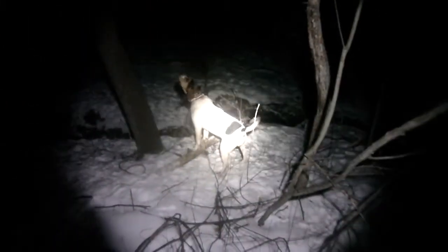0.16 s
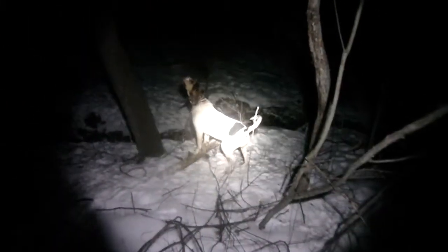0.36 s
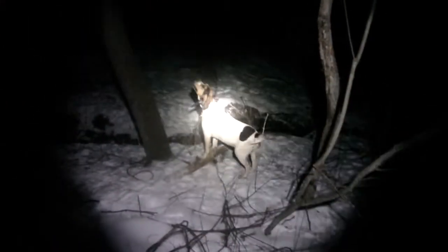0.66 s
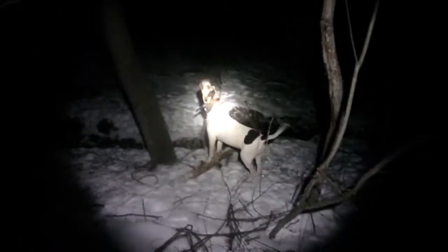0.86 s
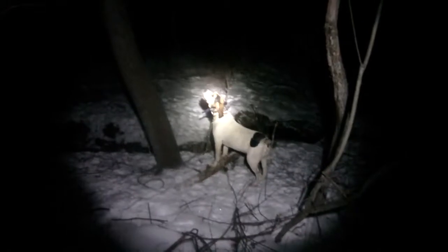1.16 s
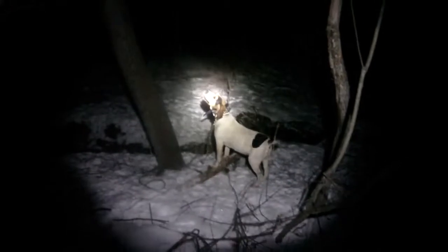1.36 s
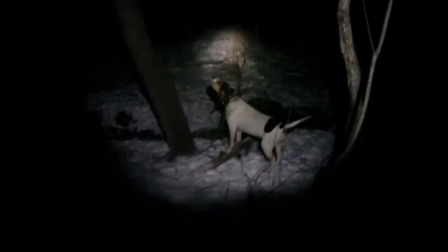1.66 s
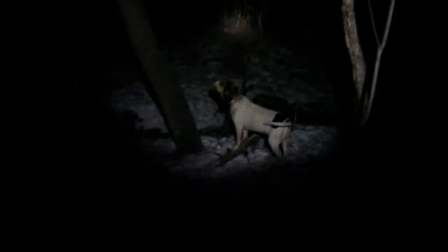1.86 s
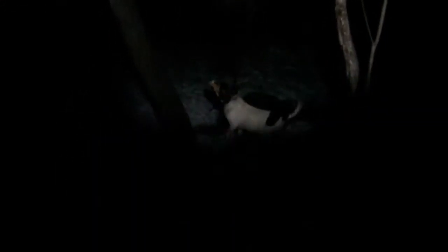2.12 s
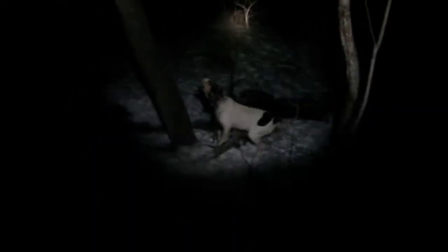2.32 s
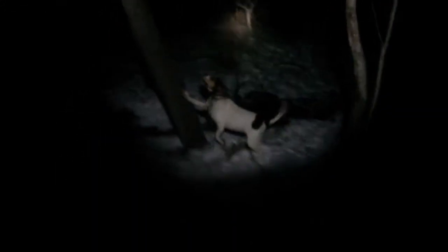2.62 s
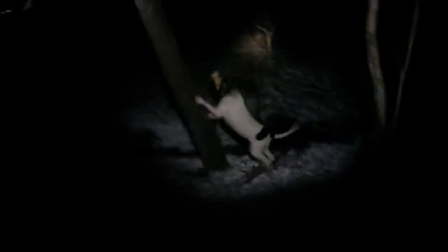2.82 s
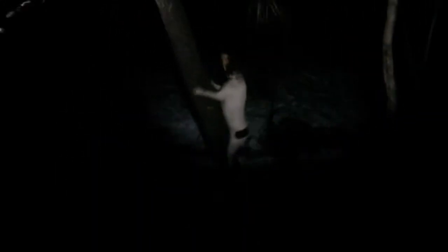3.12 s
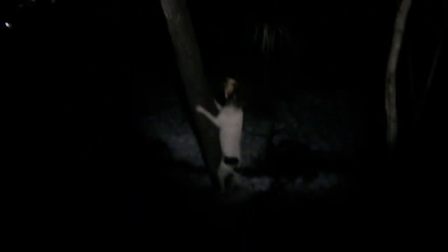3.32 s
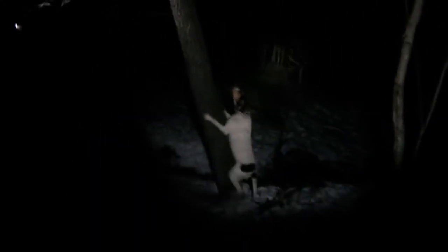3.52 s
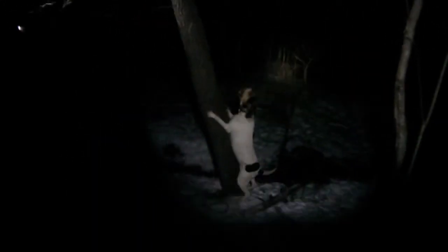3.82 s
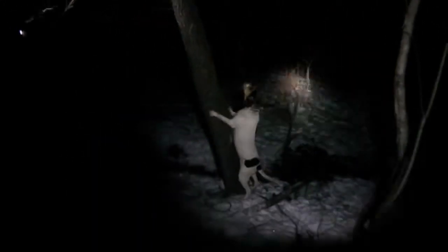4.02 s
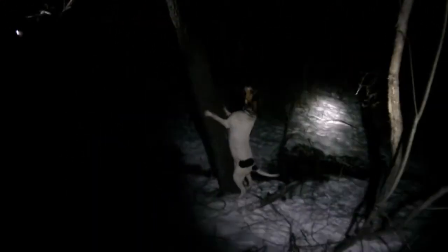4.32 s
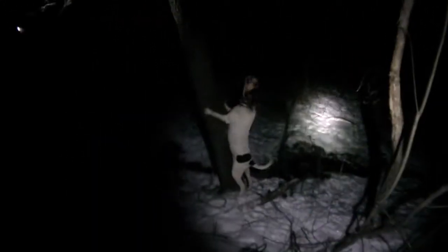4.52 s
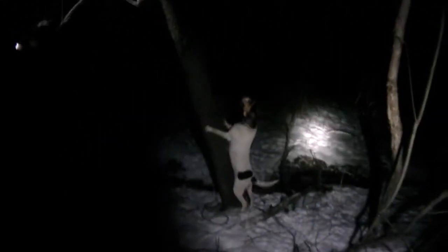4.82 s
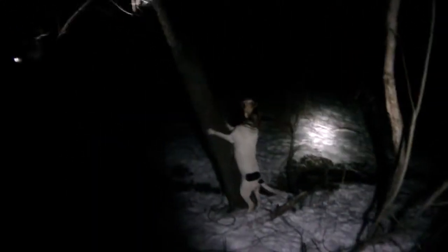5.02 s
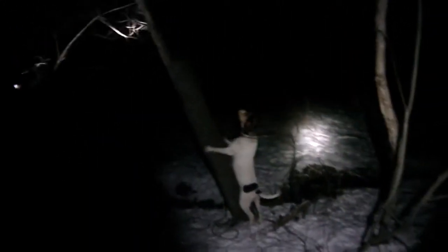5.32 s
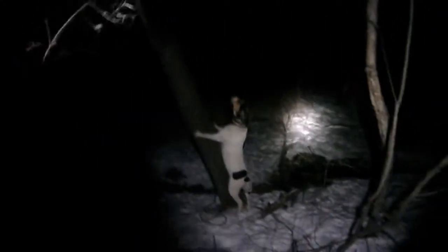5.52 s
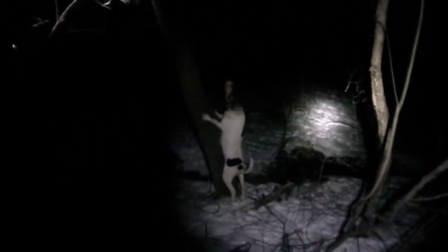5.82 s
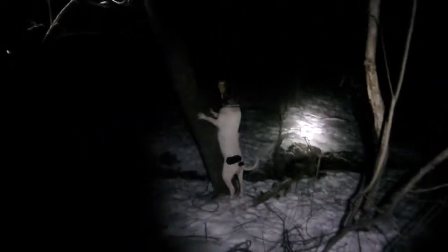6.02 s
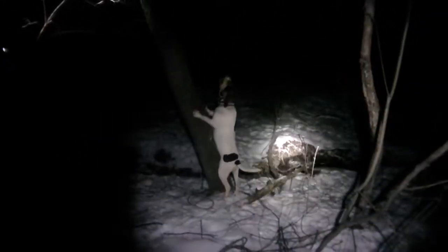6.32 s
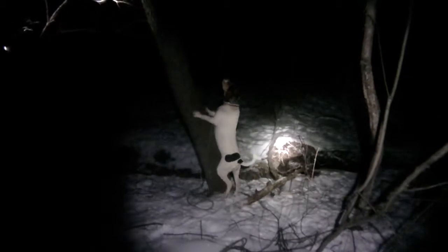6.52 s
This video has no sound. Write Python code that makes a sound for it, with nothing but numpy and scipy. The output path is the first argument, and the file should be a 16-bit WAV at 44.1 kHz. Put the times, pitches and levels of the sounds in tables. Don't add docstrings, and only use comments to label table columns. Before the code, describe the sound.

Steady single barks from a treeing dog echo off trunks at night, with snow crunches, sharp claw cracks and a faint tag tinkle.

```python
import sys
import numpy as np
from scipy import signal
from scipy.fft import rfft, irfft, next_fast_len
from scipy.io import wavfile
from scipy.ndimage import uniform_filter1d, map_coordinates

SR = 44100
rng = np.random.default_rng(int(sys.argv[2]) if len(sys.argv) > 2 else 0)


def bounce(signal):
    frames = np.transpose(np.atleast_2d(signal))
    limited = np.clip(frames, -1, 1)
    pcm = np.round(limited * 32767).astype(np.int16)
    wavfile.write(sys.argv[1], SR, pcm)


def boost_factor(decibels):
    exponent = np.asarray(decibels, float) / 20
    return 10 ** exponent


N = 293706
TIME = np.arange(N) / SR
PREROLL_S = .015
TAIL_S = 0.095


def unit(x):
    return x / np.sqrt(np.mean(x ** 2) + 1e-20)


def noise(size=N):
    return rng.standard_normal(size)


def along(points, hz):
    f, v = np.transpose(points)
    return np.interp(np.log(hz + 1), np.log(f + 1), v)


def resonances(modes, f):
    total = 0
    for k, (centre, width, db) in enumerate(modes):
        damping = 1j * f * width
        total = total + (-1) ** k * boost_factor(db) * damping / (centre * centre - f * f + damping)
    return total


def filtered(x, response):
    m = next_fast_len(x.shape[-1] + 8192)
    spectrum = rfft(x, m) * response(np.fft.rfftfreq(m, 1 / SR))
    return irfft(spectrum, m)[..., :x.shape[-1]]


def wobble(rate, size):
    knots = noise(int(size * rate / SR) + 4)
    return map_coordinates(knots, [np.arange(size) * rate / SR])


def patchy(x, depth_db, size=6):
    z = signal.stft(x, nperseg=256)[2]
    field = uniform_filter1d(noise(z.shape), size=3, axis=0)
    field = uniform_filter1d(field, size=size, axis=1)
    return signal.istft(z * boost_factor(depth_db * unit(field)), nperseg=256)[1][:len(x)]


def add(track, s, sound):
    first = round(s * SR)
    part = track[..., max(first, 0):first + sound.shape[-1]]
    part += sound[..., max(-first, 0):][..., :part.shape[-1]]


def night_air():
    # f/Hz, level/dB
    murmur = [(20, -43.5), (60, -9), (300, -6), (480, 7.5), (850, -3.5), (1500, -8.5), (4000, -18),
              (15500, -21.5)]
    air = unit(filtered(noise(), lambda f: boost_factor(along(murmur, f))))
    return boost_factor(-56.5 + 2.8 * wobble(2.392, N)) * air


def grains(colour, per_second, spread_db, size=N):
    breaks = rng.random(size) < per_second / SR * boost_factor(4 * wobble(25, size))
    sizes = noise(size) * boost_factor(spread_db * np.minimum(rng.exponential(size=size), 3.5))
    bed = .3 * noise(size)
    return unit(patchy(filtered(breaks * sizes + bed, colour), depth_db=4.0))


def footfall(length_s, db, brightest_hz, thud_db):
    t = np.arange(round(1.7 * length_s * SR)) / SR
    press = np.clip(t / 0.0136, 0, 1) * np.exp(-(t / length_s) ** 3)

    def colour(f):
        broad = .35 * f / (f + 900) / (1 + f / 12000)
        return broad + abs(resonances([(brightest_hz, .8 * brightest_hz, 0)], f))

    thud = unit(filtered(noise(len(t)), lambda f: resonances([(242, 386, 0)], f) ** 2))
    crunch = grains(colour, per_second=7700, spread_db=2.52, size=len(t))
    return press * (boost_factor(db) * crunch + boost_factor(thud_db) * thud)


def paws():
    # t/s, level/dB
    restlessness = [(0.0, -46), (0.2, -72), (1.78, -66), (2.35, -59.5), (2.74, -59), (2.86, -50.5),
                    (3.91, -65), (4.06, -60.5), (5.19, -70), (5.79, -58.5), (6.07, -74.5), (6.66, -63)]
    # f/Hz, level/dB
    coarse = [(100, -28), (250, -8), (1200, -4), (2400, 0), (3600, -1), (6000, -6), (9000, -11),
              (15000, -22)]
    # f/Hz, level/dB
    fine = [(3000, -24), (6000, -7), (8000, -2), (10500, 0), (13000, -1), (15500, -2)]
    # t/s, length/s, level/dB, brightest f/Hz, thud level/dB
    falls = [(0.551, 0.0682, -50, 3235, -50.5), (0.65, 0.115, -55, 3520, -55.5),
             (1.016, 0.049, -59.5, 3000, -61.5), (1.077, 0.124, -53, 3050, -56),
             (1.198, 0.1055, -57, 2730, -70), (1.402, 0.073, -60.5, 1700, -70),
             (1.805, 0.127, -64, 3900, -60), (2.405, 0.096, -51.5, 3010, -45),
             (2.506, 0.063, -51, 3500, -74), (2.665, 0.028, -58, 1800, -74),
             (2.71, 0.065, -44.5, 5400, -56.5), (2.77, 0.2, -67.5, 2440, -56),
             (3.601, 0.088, -50, 6840, -66.5), (3.73, 0.055, -49.5, 7360, -51),
             (3.979, 0.0728, -55, 8670, -49), (4.142, 0.067, -58.5, 4560, -60),
             (4.721, 0.048, -55.5, 3410, -81.5)]
    s, busy_db = np.transpose(restlessness)
    busy_db = np.interp(TIME, s, busy_db - busy_db.mean())
    crunch = grains(lambda f: boost_factor(along(coarse, f)), per_second=1400, spread_db=4.0)
    crust = grains(lambda f: boost_factor(along(fine, f)), per_second=8400, spread_db=7.0)
    out = boost_factor(-60.5 + 0.95 * busy_db) * crunch + boost_factor(-70 + 1.44 * busy_db) * crust
    for start, *fall in falls:
        add(out, start, footfall(*fall))
    return out


def snaps():
    # t/s, peak level/dB, centre f/Hz
    cracks = [(0.3482, -45, 9000), (0.5476, -39, 3195), (1.08, -44.5, 6140), (1.816, -43, 3860),
              (2.5619, -36, 2616), (2.7142, -34.5, 5640), (2.7227, -31.5, 5400), (2.7738, -31, 1600),
              (2.94, -26.5, 4000), (3.259, -45, 6200), (3.5151, -21.5, 3680), (3.6015, -37.5, 3290),
              (3.678, -44, 5710), (3.78, -39.5, 3370), (4.0091, -37.5, 2530), (4.1444, -37.5, 3200),
              (4.1843, -42, 4330), (4.2548, -59, 8780), (4.7706, -44.5, 3470), (4.9033, -43, 2510),
              (5.122, -26.5, 2990), (5.1412, -22.5, 2830), (5.1773, -38.5, 3000), (5.324, -41, 5900),
              (5.432, -42.5, 5900), (6.014, -47.5, 4272), (6.5204, -48, 903)]
    out, t = np.zeros(N), np.arange(SR // 12) / SR
    for s, db, hz in cracks:
        t60 = 0.0336 * boost_factor(-0.387 * (db + 34))
        crack = boost_factor(-60 * t / max(t60, .003)) * np.clip(t / 0.00197, 0, 1) * noise(len(t))
        crack = filtered(crack, lambda f: resonances([(hz, 0.673 * hz, 0)], f) / (1 + (f / (hz + 4500)) ** 6))
        thud_db = min(db - 40, -50) - 3
        thud = boost_factor(thud_db - 60 * t / .07) * np.sin(2 * np.pi * 230 * t) * np.clip(t / .005, 0, 1)
        add(out, s, boost_factor(db) * crack / abs(crack).max() + thud)
    return out


def tags():
    # t/s, level/dB
    touches = [
        (2.854, -70),
        (3.19, -51.5),
        (3.277, -55.5),
        (3.313, -54),
        (3.338, -42.5),
        (3.407, -38),
        (3.669, -50),
        (3.72, -51.5),
    ]
    # f/Hz, level/dB, t60/s
    ringing = [(7627, -14, .04), (9227, -10, .05), (10383, -8.5, 0.234), (10800, -8, 0.071)]
    out, t = np.zeros(N), np.arange(SR // 4) / SR
    for s, db in touches:
        for hz, mode_db, t60 in ringing:
            decay = boost_factor(db + mode_db + rng.normal(0, 5.56) - 60 * t / t60)
            add(out, s, decay * np.sin(2 * np.pi * hz * t + 0.72 * wobble(90, len(t))))
    return out


def gulp():
    # f/Hz, width/Hz, level/dB
    airway = [(1447, 230, -4.5), (2235, 300, 7), (3900, 250, -8)]
    peak_s, rise_s, fall_s = 1.94, .04, .07
    rush = noise() * boost_factor(0.99 * wobble(78, N))
    air = unit(filtered(rush, lambda f: resonances(airway, f)))
    draw = np.exp(-((TIME - peak_s) / np.where(TIME < peak_s, rise_s, fall_s)) ** 2)
    return air * boost_factor(-46) * draw


def woods(x):
    # f/Hz, t60/s
    far_decay = [(250, 0.3), (500, 1.454), (1000, 1.059), (2000, 1.49), (4000, 0.65), (9000, 1.5)]
    clumps = patchy(noise(round(1.6 * SR)), depth_db=4)
    hz, t, z = signal.stft(clumps, SR, nperseg=256)
    far = boost_factor(-60 * t / along(far_decay, hz)[:, None])
    near = boost_factor(18.0 - 60 * t / 0.1552)
    envelope = (far + near) * np.clip(t / 0.008, 0, 1) * (hz[:, None] > 200)
    tail = signal.istft(z * envelope, SR, nperseg=256)[1]

    def least_soaked(f):
        return (1 + resonances([(569.4, 31.6, 9.2)], f)) * (1 + resonances([(821.7, 112.5, 1.333)], f))

    hollow = filtered(tail, least_soaked)
    return signal.fftconvolve(x, hollow / np.linalg.norm(hollow) * 3.174)


def snow_bank(x):
    return boost_factor(-17.5) * filtered(x, lambda f: resonances([(496, 258, -1.5), (954, 100, -17.0)], f))


def effort(t, pushed, aim_hz, glide, level_db, size, narrows, chest_db, bright_db, lead, last_db):
    # f/Hz, level/dB
    jaw_wide = [(721, 4), (905, 2), (1034, 4), (1118, 1), (1370, -19), (1540, -3.5), (1828, 0.17),
                (2144, -29)]
    # f/Hz, level/dB
    jaw_narrow = [(721, -20), (905, -6), (1034, -25), (1118, -13), (1382, -10.5), (1558, -10),
                  (1828, -31.5), (2144, -28.5)]
    after = np.maximum(t - pushed, 0)
    gullet_db = last_db * np.exp(-((t - pushed) / 0.01595) ** 2)
    rising = aim_hz * np.maximum(1 - .4 * np.exp(-np.minimum(t, pushed) / glide), .69)
    rest_hz = 138.93
    pitch = rest_hz + (rising - rest_hz) * np.exp(-(after / .047) ** 1.4)
    pitch = pitch + 4 * gullet_db
    breath_db = level_db + 20 * np.log10(np.maximum(1 - np.exp(-(t + lead) / 0.04075), 1e-7))
    dying = 1 - np.exp(-(after / 0.0383) ** 3.75)
    narrow = 1 / (1 + np.exp((narrows - t) / 0.0084))

    def jaw(hz):
        return (1 - narrow) * along(jaw_wide, hz / size) + narrow * along(jaw_narrow, hz / size)

    db_per_hz = 0.1323 * (1 + 0.0547 * min(chest_db, 0) * (1 - dying))
    first = breath_db + chest_db * (1 - 0.266 * dying) + db_per_hz * (pitch - 475.67)
    orders = [first + gullet_db - 2.5 * dying]
    for k in range(2, 5):
        orders.append(breath_db + jaw(k * pitch) + bright_db * (k > 2) - 39 * dying)
    return pitch, orders


def bark(push, mouth, rasp_db, lead, onset_db, onset_hz, last_db):
    # f/Hz, width/Hz, level/dB
    throat = [(598.2, 358, 5.5), (1134, 562, 5), (1700, 879, 4.5), (2324.7, 602, -3)]
    # f/Hz, width/Hz, level/dB
    palate = [(3300, 600, -4), (4150, 360, 2.5), (4800, 420, 0), (5800, 520, -2), (6950, 620, 1),
              (8900, 1200, -5.5), (12000, 4000, -7)]
    t = np.arange(SR // 4) / SR - PREROLL_S
    size = len(t)
    hz, order_db = effort(t, *push, *mouth, lead, last_db)
    bright_db = mouth[-1]
    pitch = hz * (1 + .01 * wobble(150, size))
    turn = 2 * np.pi * np.cumsum(pitch) / SR

    def shake(k):
        return .8 * k + .12 * k * wobble(140, size)

    low = [boost_factor(db + (.7 + .9 * k) * wobble(80, size)) for k, db in enumerate(order_db)]
    tone = sum(np.sqrt(2) * g * np.sin((k + 1) * turn + shake(k)) for k, g in enumerate(low))
    opening = np.sqrt(low[1] ** 2 + low[2] ** 2 + low[3] ** 2 + (0.0433 * low[0]) ** 2)
    for k in range(5, 8):
        breakup = boost_factor(-13.5 + 0.77 * bright_db) * boost_factor(4 * wobble(50, size))
        formant = abs(resonances(throat, k * pitch)) ** 2
        tone += breakup * opening * formant * np.sin(k * turn + shake(k))

    puffs = (1 + 0.47 * np.cos(turn)) * boost_factor(4 * wobble(42, size)) * noise((2, size))

    def rasp_colour(f):
        return resonances(throat, f) ** 2 * (.002 + f ** 4 / (f ** 4 + 420 ** 4))

    rasp = boost_factor(rasp_db + 0.11) * opening ** 0.4588 * unit(filtered(puffs[0], rasp_colour))
    stretch = 1 + rng.normal(0, .012)
    clicks = np.exp(60 * np.cos(turn) - 60) * 4.13
    hiss = filtered(puffs[1] + clicks, lambda f: resonances(palate, f / stretch) ** 2)
    hiss = unit(patchy(hiss, depth_db=5.5, size=12))
    hiss = boost_factor(-34.5) * opening ** .5 * np.clip((t + lead) / 0.0236, 0, 1) * hiss

    u = np.maximum(t + max(lead, 0), 0) / 0.0168
    onset_tone = boost_factor(onset_db) * u ** 2 * np.exp(2 - 2 * u)
    onset_tone = onset_tone * np.sin(2 * np.pi * onset_hz * t + .3 * wobble(60, size))
    fade = np.clip((push[0] + TAIL_S - t) / 0.03, 0, 1)
    return (tone + rasp + hiss) * fade + onset_tone


def hound():
    # start t/s, pushed t/s, aimed f/Hz, glide t/s, level/dB
    barks = [(-0.05, 0.1106, 469.8, 0.05017, -20.5), (.712, 0.1123, 487.2, 0.0408, -21),
             (1.492, 0.1047, 510.4, 0.0512, -23.5), (2.214, 0.1185, 512.8, 0.0309, -8.5),
             (2.873, 0.1266, 535.9, .031, -14.5), (3.29, 0.1187, 535.8, 0.04583, -13),
             (3.806, 0.1094, 572.7, 0.083, -13), (4.42, 0.1123, 507.6, .035, -14.5),
             (5.028, 0.12, 497.6, 0.03876, -18.5), (5.658, 0.1262, 521.2, 0.02217, -21.5),
             (6.24, 0.11176, 541.2, 0.04485, -18.5)]
    # mouth size factor, jaw narrows t/s, chest level/dB, bright level/dB, rasp level/dB
    mouths = [(0.908, 0.0775, 4.5, -1.5, -23), (1.0286, 0.0686, 2, 1, -18.5),
              (1.0516, 0.0836, 6, 2.5, -20.5), (1.093, 0.0162, -12, -1.58, -20.5),
              (1.0153, 0.1165, -11, -1.5, -21.5), (1.0733, 0.0707, -12.5, -6.5, -16),
              (0.954, 0.0642, -11.5, -9, -22.5), (0.966, 0.1036, -6.5, -2.5, -24),
              (0.9617, 0.1085, 3.5, -2.41, -21), (1.0048, 0.1306, 0, 6.5, -20),
              (1.042, 0.0585, -4.13, -1, -17.5)]
    # voice leads by t/s, onset tone level/dB, onset tone f/Hz, last push
    # level/dB, echo level/dB
    edges = [(-0.0254, -66, 510, -0.5, -18), (0.0045, -50, 800, 1, -20), (0.0034, -57.5, 700, 2, -22),
             (0.000048, -18.5, 610, 0.5, -22), (.0045, -19.5, 715, 7.5, -22.7),
             (-0.01427, -15, 660, 3.5, -19), (0.0053, -23, 750, 4, -21), (0.00327, -25.5, 600, 0.5, -22),
             (0.00506, -41, 380, 2, -22), (.006, -29, 605, 1.5, -24.5), (.0015, -39, 805, 2, -21.5)]
    out = np.zeros(N)
    for (start, *push), (*mouth, rasp_db), (*edge, echo_db) in zip(barks, mouths, edges):
        s = start - PREROLL_S
        voice = bark(push, mouth, rasp_db, *edge)
        add(out, s, voice)
        add(out, s, boost_factor(echo_db) * woods(voice))
        add(out, s + .064, snow_bank(voice))
    return out


def scene():
    ahead = night_air() + paws() + snaps() + tags() + gulp() + hound()
    return np.array([ahead, ahead])


def low_pass(x):
    return signal.sosfilt(signal.butter(12, 15780, fs=SR, output="sos"), x)


def record(dry):
    # f/Hz, level/dB
    preamp = [(25, 9), (100, 4.5), (500, -19), (2000, -6.5), (5000, 1), (12000, 0.5), (15500, -6)]
    dry = dry / (1 + abs(dry / 1.05) ** 4) ** .25
    dry = filtered(dry, lambda f: 1j * f / (90 + 1j * f))
    hiss = boost_factor(-71.5) * unit(filtered(noise(), lambda f: boost_factor(along(preamp, f))))
    apart = filtered(dry[0], lambda f: 1j * (boost_factor(-50) + boost_factor(-7) * np.minimum(f / 9000, 1) ** 2))
    apart = patchy(apart, depth_db=5) * wobble(150, N)
    whine = boost_factor(-80) * np.sin(2 * np.pi * 11988 * TIME + wobble(12, N))
    mix = dry + whine + (hiss + apart) * np.array([[1], [-1]])
    mix = filtered(mix, lambda f: 1 / (1 + (f / 15350) ** 80))
    return low_pass(mix)


dry = scene()
out = record(dry)
bounce(out)
```